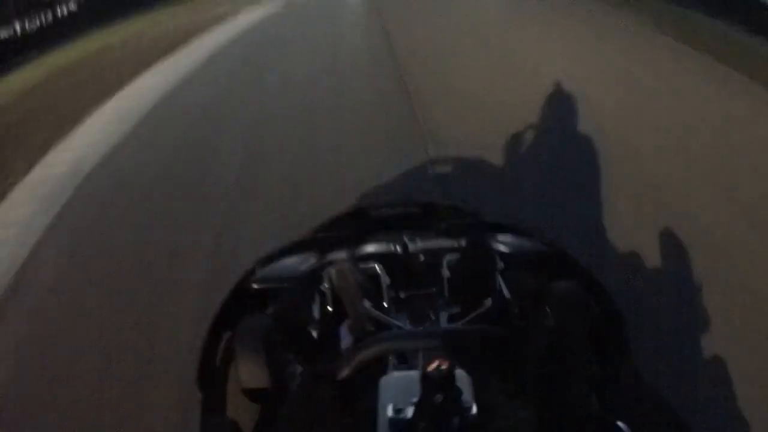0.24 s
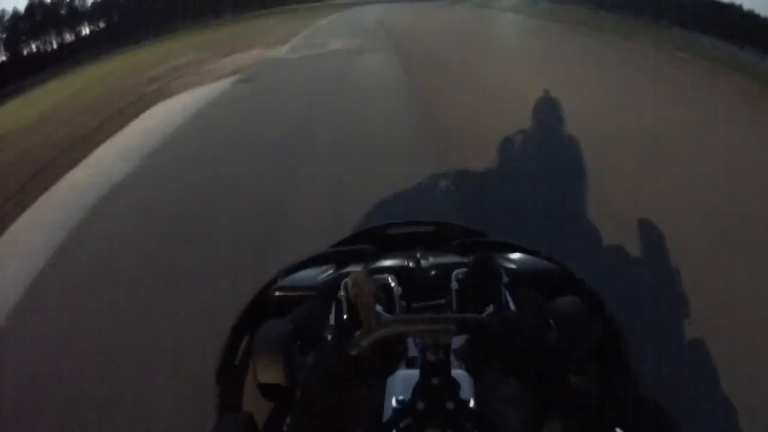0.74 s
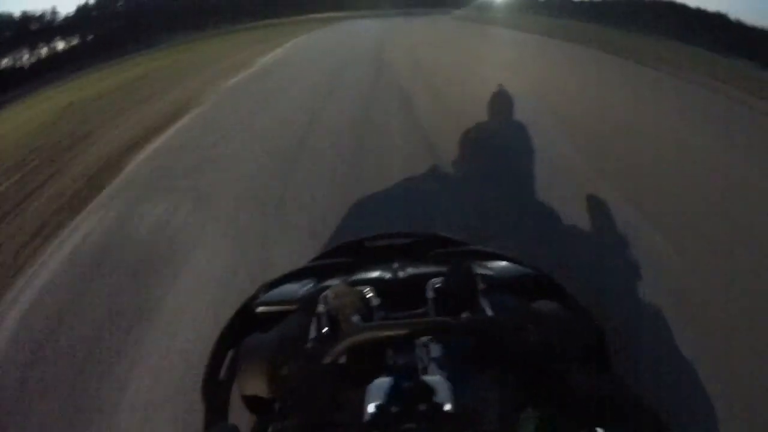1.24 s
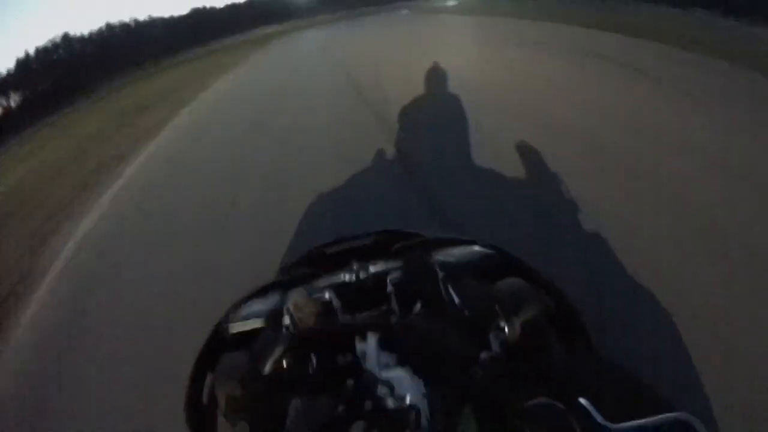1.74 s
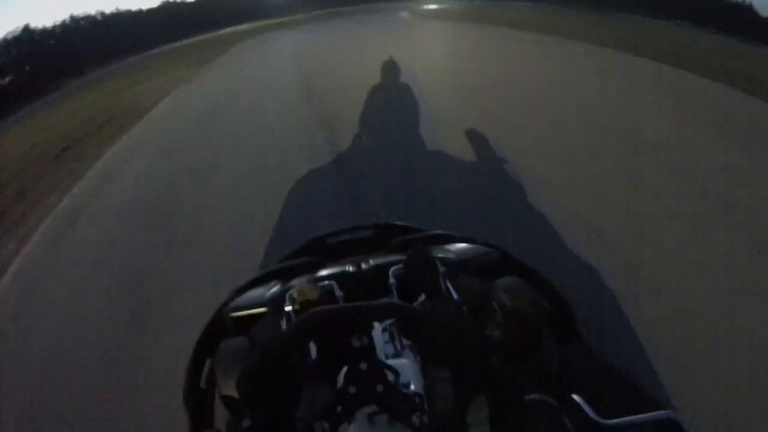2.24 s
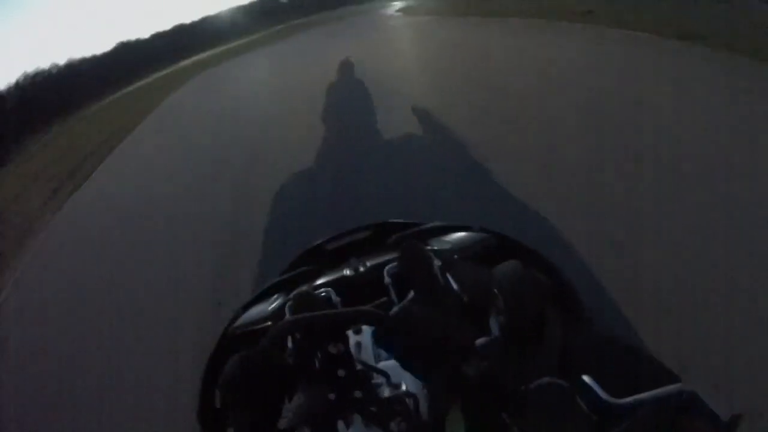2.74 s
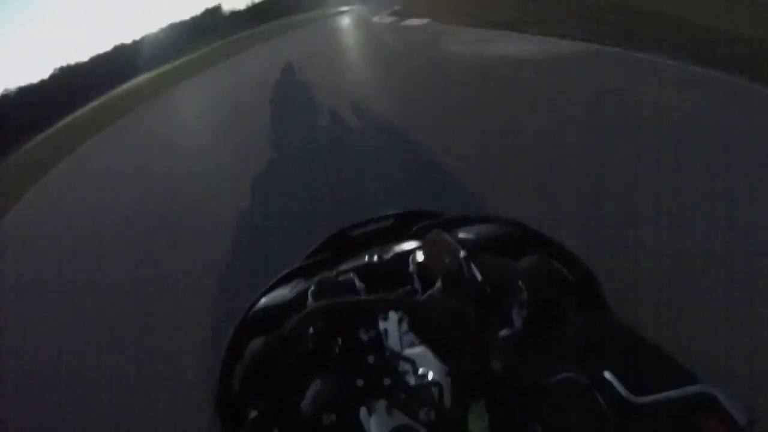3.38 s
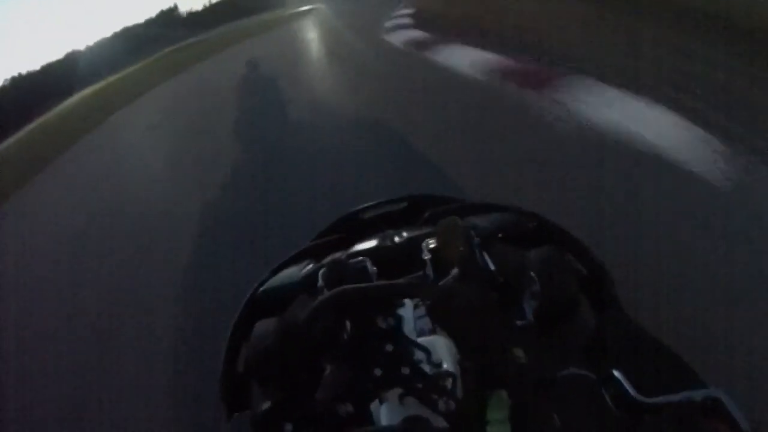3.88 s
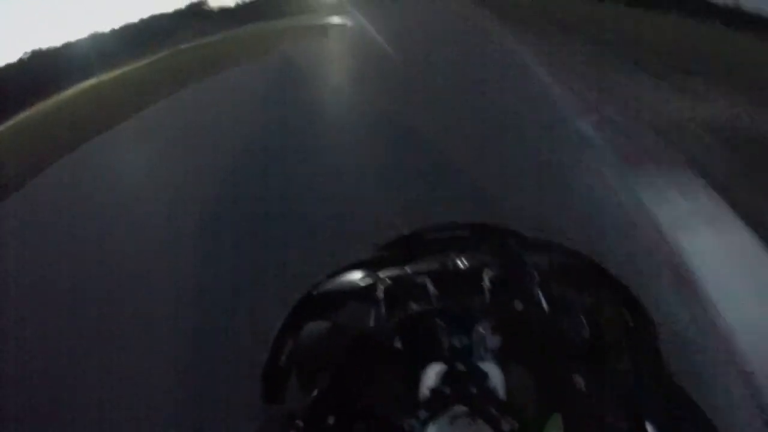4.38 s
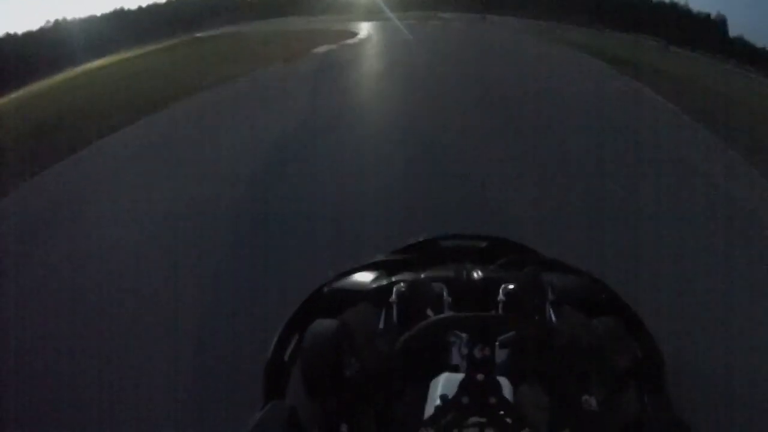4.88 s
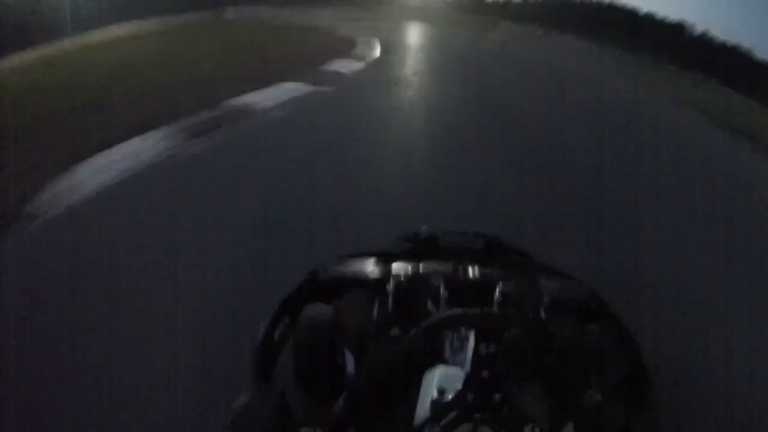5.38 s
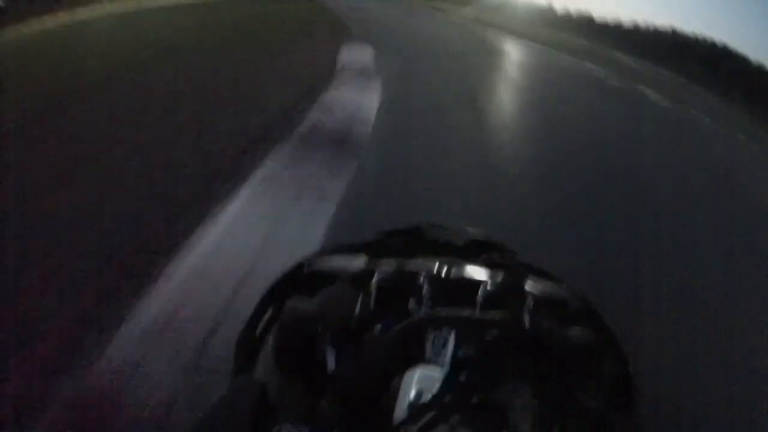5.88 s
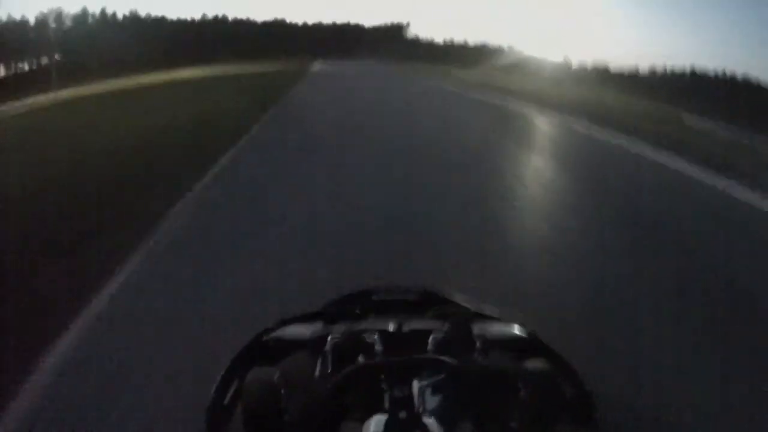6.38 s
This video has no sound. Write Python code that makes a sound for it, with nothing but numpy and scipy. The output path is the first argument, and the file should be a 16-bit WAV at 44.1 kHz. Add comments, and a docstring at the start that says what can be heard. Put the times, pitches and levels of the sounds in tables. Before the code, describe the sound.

On board a racing kart, rapid exhaust pops quicken steadily under harsh airy roar, headwind rumble and a late gusty howl.

```python
"""Kart engine running up to top revs

A four-stroke single-cylinder kart gathers speed, heard on board by a camera shut in a plastic case.
Each firing is an impulse that pops through the exhaust filter and strikes the decaying modes of the frame.
The chain whines at its tooth-meeting rate; pulsing noise of gas and headwind roars in the modes of the case.
Shaped noise gives the headwind's low buffeting, its mid rush and a gusty howl.
"""
import sys
import numpy as np
from scipy import signal
from scipy.fft import rfft, irfft
from scipy.io import wavfile
from scipy.ndimage import uniform_filter1d

SR = 44100
rng = np.random.default_rng(int(sys.argv[2]) if len(sys.argv) > 2 else 0)


def rack_gain(trim_db):
    """Turn a fader trim in dB into the linear factor to multiply a signal by."""
    fader = np.asarray(trim_db, float)
    return 10 ** (fader / 20)


def materialize(psi):
    """Save the field psi as 16-bit PCM at rate SR to the path in sys.argv[1].

    A 1-D psi becomes a single channel; in a 2-D psi each row is a channel.
    """
    bounded = np.clip(np.atleast_2d(psi).T, -1, 1)
    quanta = np.round(bounded * 32767).astype(np.int16)
    wavfile.write(sys.argv[1], SR, quanta)


N = 291942


def level(x, db):
    """Root-mean-square normalisation: scale a signal to an rms level in dB."""
    return x * rack_gain(db) / np.sqrt(np.mean(x ** 2))


def curves(table):
    """Linear interpolation in time: one curve for each column after the time."""
    times_s, *columns = np.transpose(table)
    return [np.interp(np.arange(N) / SR, times_s, column) for column in columns]


def climb(octaves, start_db, per_octave_db):
    """Power law of engine speed: the level grows by a fixed number of dB per octave of revs."""
    return start_db + per_octave_db * octaves


def walk(rate):
    """Smoothed random fluctuation: values held 1 / rate s, averaged twice; standard deviation near 0.36."""
    hold = int(SR / rate)
    steps = np.repeat(rng.standard_normal(N // hold + 1), hold)
    smooth = uniform_filter1d(uniform_filter1d(steps, hold), hold)
    return 0.48 * smooth[:N]


def ring(x, hz, width):
    """Second-order resonance: a band-pass with unit gain at its centre."""
    return signal.lfilter(*signal.iirpeak(hz, hz / width, fs=SR), x)


def twice(x, hz, width):
    """Cascaded resonance: two passes multiply the responses and steepen the skirts."""
    return ring(ring(x, hz, width), hz, width)


def coloured(spectrum):
    """Spectral shaping: white noise weighted in the frequency domain, rms 1."""
    hz, db = np.transpose(spectrum)
    bins = np.fft.rfftfreq(N, 1 / SR) + 1
    gain = rack_gain(np.interp(np.log(bins), np.log(hz), db, left=-60, right=-60))
    return level(irfft(gain * rfft(rng.standard_normal(N)), N), 0)


def response(spectrum, size=8192):
    """Minimum-phase principle: folding the cepstrum gives a causal impulse response with the spectrum."""
    hz, db = np.transpose(spectrum)
    bins = np.fft.rfftfreq(size, 1 / SR) + 1
    gain_db = np.interp(np.log(bins), np.log(hz), db)
    cepstrum = irfft(np.log(rack_gain(gain_db)))
    cepstrum[1:size // 2] *= 2
    cepstrum[size // 2 + 1:] = 0
    return irfft(np.exp(rfft(cepstrum)))


def firings(turn, scatter_db):
    """Impulse train: one click at each new engine cycle, each of its own random size."""
    clicks = np.diff(np.floor(turn), prepend=np.floor(turn[0]))
    sizes = rack_gain(scatter_db * rng.standard_normal(900))
    return clicks * sizes[turn.astype(int)]


def exhaust(turn, rate, octaves):
    """Source-filter principle: firing pops, and thuds a crank turn later, excite pipe and silencer."""
    # exhaust pipe, its dips carved by echoes: (frequency [Hz], gain [dB])
    pipe = [(25, 5.5), (95, -6), (190, 2), (270, -3), (305, -9.5), (400, -21), (440, -54), (490, -11.5),
            (560, -7.5), (630, -11), (760, -11), (850, -11), (1000, -29.5), (1500, -55)]
    # silencer ring, strongest in the middle revs: (time [s], level [dB])
    silencer_levels = [(0, -46), (1.2, -44.5), (3.5, -37.5), (4.3, -38.5), (4.9, -48), (6.62, -43.5)]
    silencer_hz, silencer_width_hz = 365, 105
    pop_db = climb(octaves, start_db=-46, per_octave_db=9.6)
    silencer_db, = curves(silencer_levels)

    # half a cycle is one crank turn
    clicks = firings(turn, scatter_db=0.5) + 0.29 * firings(turn + 0.5, scatter_db=3.0)
    # a train of unit clicks has harmonics of rms sqrt(2) rate / SR
    clicks = clicks * SR / rate / np.sqrt(2)
    pops = signal.fftconvolve(rack_gain(pop_db) * clicks, response(pipe))[:N]

    # the pressure sags before the pop: an all-pass run backwards lets the bass lead
    pole = np.exp(-2 * np.pi * 250 / SR)
    pops = signal.lfilter([pole, -1], [1, -pole], pops[::-1])[::-1]
    return pops + twice(rack_gain(silencer_db) * clicks, silencer_hz, silencer_width_hz)


def frame(turn, rate):
    """Modal decay: each firing stops the frame's modes and strikes them afresh."""
    # drifting a little in pitch, mostly weaker at higher revs:
    # (time [s], rms level at the strike [dB], lowest mode [Hz])
    strikes = [(0, -32, 738), (.8, -30, 761), (1.35, -34, 768), (1.7, -42, 750), (2.35, -36, 746),
               (3, -43, 770), (5, -47, 750), (5.9, -41, 750), (6.62, -41, 748)]
    # frame modes: (multiple of the lowest mode [1], level [dB], decay time constant [s])
    frame_modes = [(1, 0, .06), (1.065, -7, .03)]
    rise_s = 0.0024
    since_s = turn % 1 / rate
    strike_db, lowest_hz = curves(strikes)
    strike_db = strike_db + 1.0 * rng.standard_normal(300)[turn.astype(int)]
    vibration = np.zeros(N)
    for multiple, db, fade_s in frame_modes:
        tone = np.sin(2 * np.pi * multiple * lowest_hz * since_s)
        vibration += rack_gain(db) * np.exp(-since_s / fade_s) * tone
    onset = 1 - np.exp(-since_s / rise_s)
    return np.sqrt(2) * rack_gain(strike_db) * onset * vibration


def chain(turn, rate):
    """Tooth-meeting tone with phase modulation: the crank speeds up after each firing."""
    teeth = 28  # met in one engine cycle
    wobble = 0.05 * np.sin(2 * np.pi * turn)  # in tooth periods
    full_db, full_hz, fade_db_per_hz = -43.5, 37.2, 4  # full level from this firing rate upwards
    db = full_db - fade_db_per_hz * np.maximum(full_hz - rate, 0) + 3.0 * walk(7)
    return np.sqrt(2) * rack_gain(db) * np.cos(2 * np.pi * (teeth * turn + wobble))


def roar(turn, octaves):
    """Amplitude-modulated turbulence: gas and air noise swells after firings and excites the case modes."""
    # rms level of the roar below 3600 Hz: (time [s], level [dB])
    body_levels = [(0, -24), (.4, -23), (1.45, -20.5), (1.85, -22), (3.0, -19), (3.2, -20), (4.4, -17.5),
                   (5.9, -19), (6.3, -15), (6.62, -15)]
    # modes of the camera case, balanced within each band: (frequency [Hz], width of one pass [Hz], level [dB])
    case_modes = [(1576.6, 311, 0), (1900, 260, -4.5), (2327, 760, -6.5), (3300, 580, -14),
                  (4300, 920, -19.5), (4910, 384, -12), (5580, 870, -18.5), (6440, 1380, -19),
                  (7530, 760, -27), (9100, 3500, -28.5), (12170, 690, -32.5), (13800, 3700, -39)]
    body_db, = curves(body_levels)
    # the upper bands take a share of the swings about a mean level
    swing_db = 0.31 * (body_db - -21)
    presence_db = climb(octaves, start_db=-34.5, per_octave_db=6.9) + swing_db
    treble_db = climb(octaves, start_db=-48, per_octave_db=12.7) + swing_db

    # share of the roar that pulses with the firings: 0.6 at first, less per octave of revs
    share = np.clip(0.6 - 1.14 * octaves, 0.23, 1)
    early = turn + 0.062  # the swell starts just ahead of the pop
    cycle, since = early.astype(int), early % 1
    # every third firing, about one axle turn, is harder
    harder_db = 2.7 * share * (cycle % 3 == 0)
    size = rack_gain(1.2 * rng.standard_normal(300)[cycle] + harder_db)
    puff = size * since / 0.21 * np.exp(1 - since / 0.16)
    gate = (1 - share + 0.96 * share * puff) * rack_gain(0.46 * walk(40))
    # gas bursts out right at the pop, topped by a crack
    blast = 0.45 * share * size * np.exp(-(turn % 1) / 0.042)
    crack = 12 * share * size * ring(firings(turn, scatter_db=2.5), 2000, 3000)

    bands = np.zeros((3, N))  # divided at 3600 and 8000 Hz
    for hz, width, db in case_modes:
        air = (gate + blast * (hz < 3600)) * rng.standard_normal(N) + crack
        air = air * rack_gain(0.34 * walk(9) + 0.86 * walk(35))
        bands[int(hz > 3600) + int(hz > 8000)] += rack_gain(db) * twice(air, hz, width)
    body, presence, treble = (level(band, 0) for band in bands)
    return rack_gain(body_db) * body + rack_gain(presence_db) * presence + rack_gain(treble_db) * treble


def wind(octaves):
    """Flow noise: fluttering bands of noise make the buffeting rumble, the rush and the howl of a gap."""
    # spectrum of the buffeting: (frequency [Hz], relative density [dB])
    rumble_spectrum = [(20, 14), (30, -20), (45, -9), (70, -1.5), (110, 2.5), (150, -3.5), (220, -13),
                       (350, -17), (500, -44)]
    # spectrum of the mid rush: (frequency [Hz], relative density [dB])
    rush_spectrum = [(200, 3), (400, 1.5), (600, 2), (850, 5), (1000, 3.5), (1200, 1.5), (1400, -13),
                     (1800, -31)]
    # gusts that make the gap howl: (centre time [s], Gaussian length [s], level [dB])
    gust_times = [(4.606, 0.16, -41), (6.203, 0.066, -32.5)]
    t = np.arange(N) / SR
    # the rumble builds with the headwind for 2.3 s, then holds
    rumble_db = np.interp(t, [0, 2.3], [-33.5, -26])
    rumble = coloured(rumble_spectrum) * rack_gain(rumble_db + 0.52 * walk(7.3) + 2.4 * walk(3.25))
    rush_db = climb(octaves, start_db=-38.5, per_octave_db=8.2)
    rush = coloured(rush_spectrum) * rack_gain(rush_db + 1.5 * walk(30))

    blow = rack_gain(climb(octaves, start_db=-57, per_octave_db=28.3))
    for centre_s, length_s, db in gust_times:
        blow = blow + rack_gain(db) * np.exp(-((t - centre_s) / length_s) ** 2)
    # air across a gap
    gap_noise = level(twice(rng.standard_normal(N), hz=870, width=220), 0)
    howl = gap_noise * blow * rack_gain(1.5 * walk(8))
    return rumble + rush + howl


def scene():
    """Superposition: engine, frame, chain, roar and wind add at one microphone."""
    # engine speed: (time [s], firing rate [Hz])
    revs = [(0, 25.15), (.66, 26.9), (1.98, 30.32), (2.97, 32.65), (4.29, 34.8), (5.61, 37.4), (5.94, 37.6),
            (6.62, 37.28)]
    rate, = curves(revs)
    octaves = np.log2(rate / rate[0])
    turn = 1.065 + np.cumsum(rate) / SR  # engine cycles, two crank turns each
    engine = exhaust(turn, rate, octaves) + frame(turn, rate)
    mix = engine + chain(turn, rate) + roar(turn, octaves) + wind(octaves)
    return mix[None]


def low_pass(x):
    """Removes everything above the highest recorded frequency."""
    return signal.sosfilt(signal.butter(12, 15330, fs=SR, output="sos"), x)


def record(dry):
    """High-pass filtering: the camera cuts the deepest bass, below about 18 Hz."""
    bass_cut = signal.butter(2, 18, "high", fs=SR, output="sos")
    mix = signal.sosfilt(bass_cut, dry)
    return low_pass(mix)


dry = scene()
out = record(dry)
materialize(out)
```